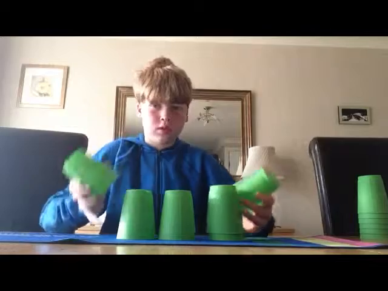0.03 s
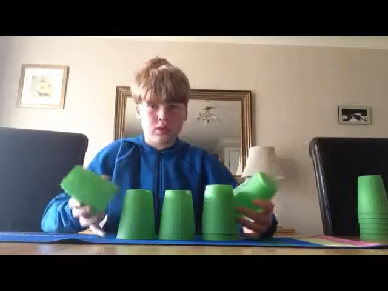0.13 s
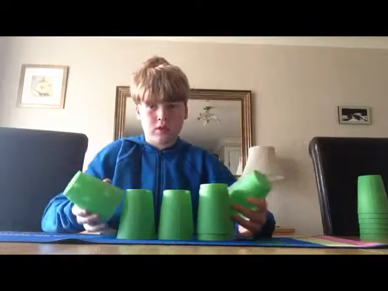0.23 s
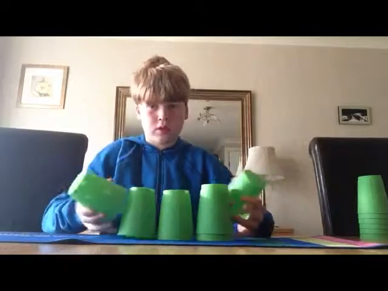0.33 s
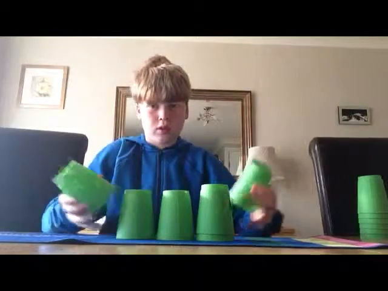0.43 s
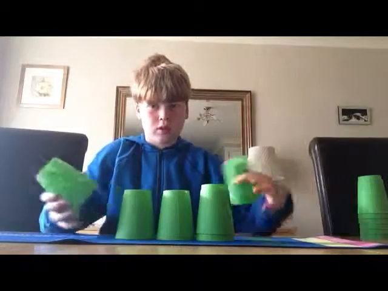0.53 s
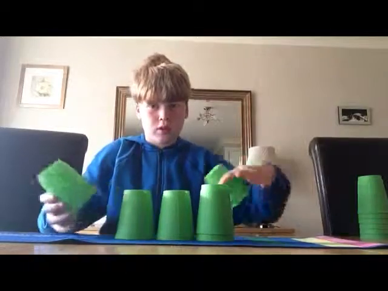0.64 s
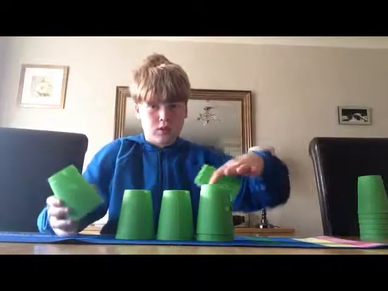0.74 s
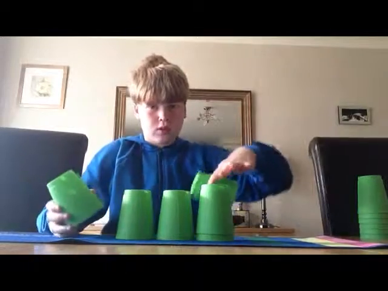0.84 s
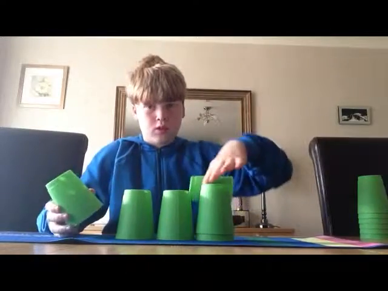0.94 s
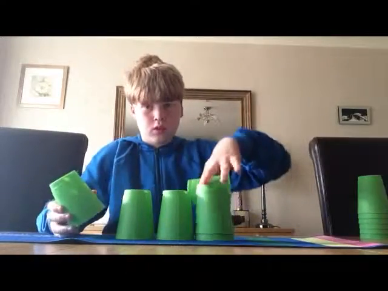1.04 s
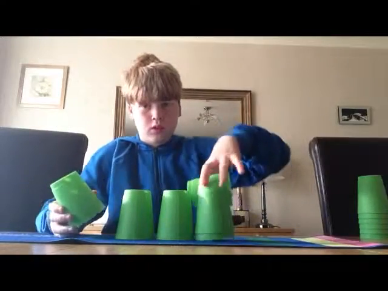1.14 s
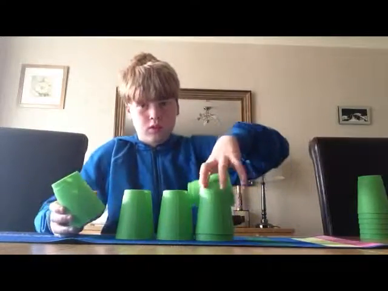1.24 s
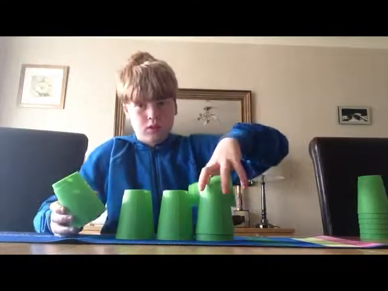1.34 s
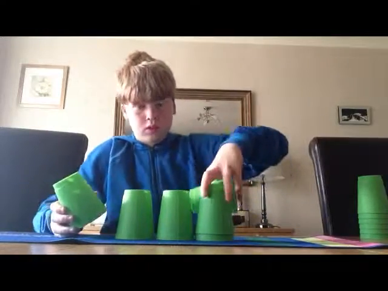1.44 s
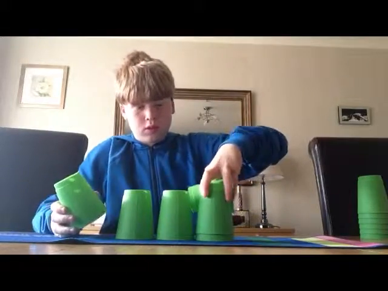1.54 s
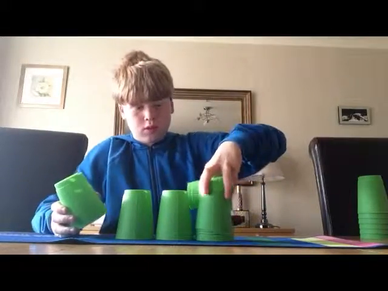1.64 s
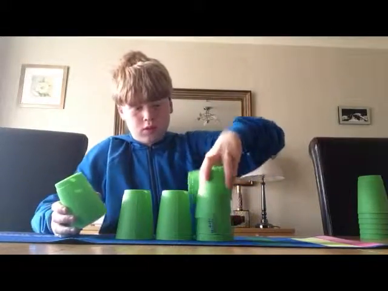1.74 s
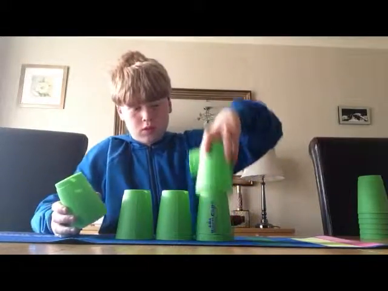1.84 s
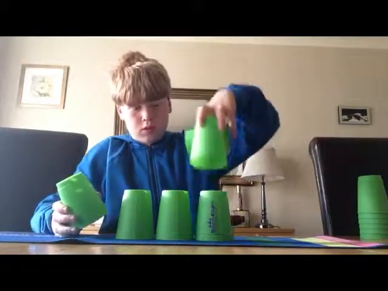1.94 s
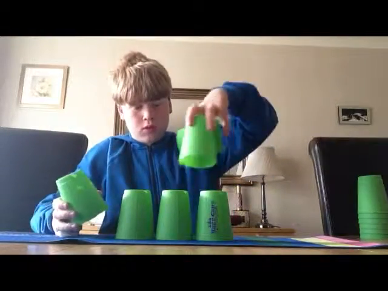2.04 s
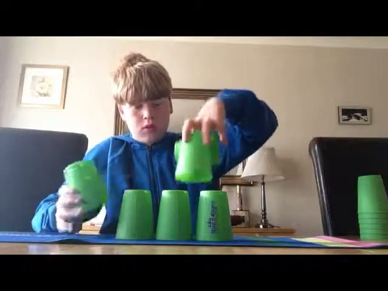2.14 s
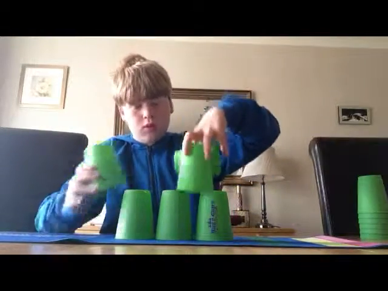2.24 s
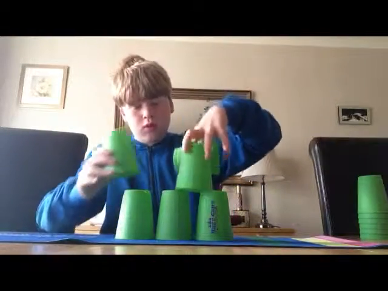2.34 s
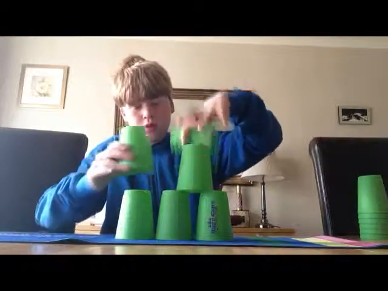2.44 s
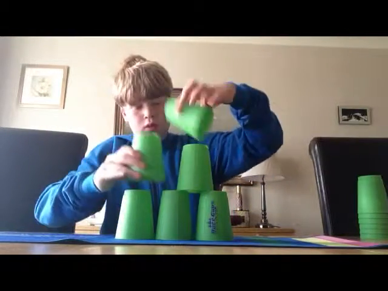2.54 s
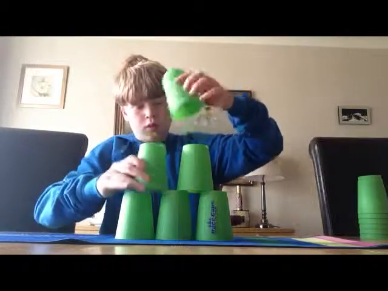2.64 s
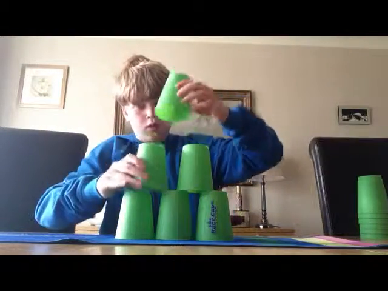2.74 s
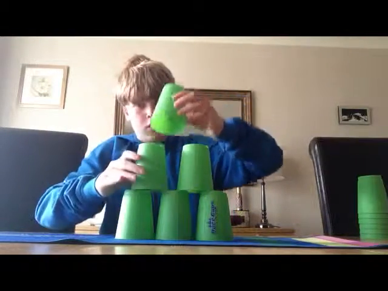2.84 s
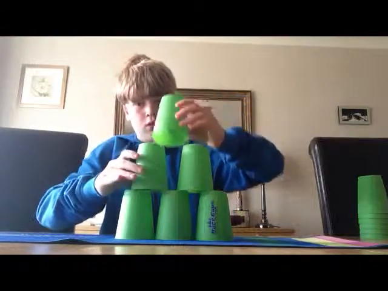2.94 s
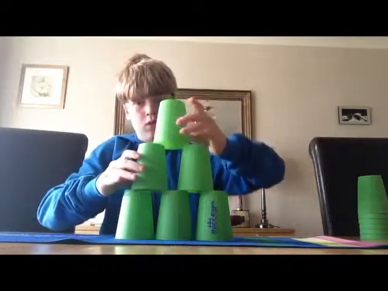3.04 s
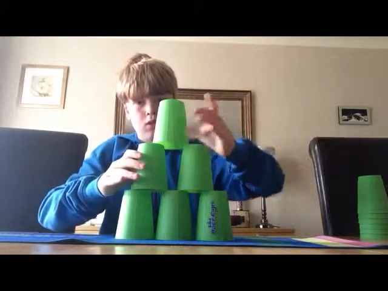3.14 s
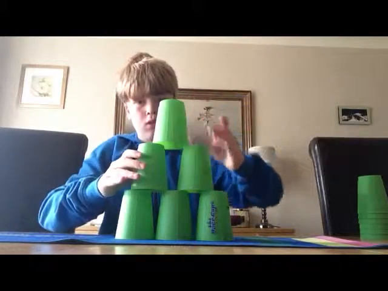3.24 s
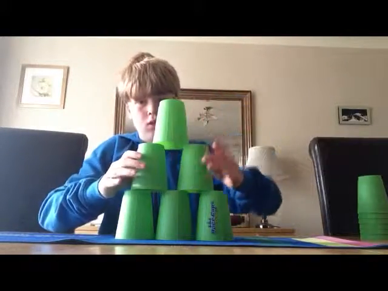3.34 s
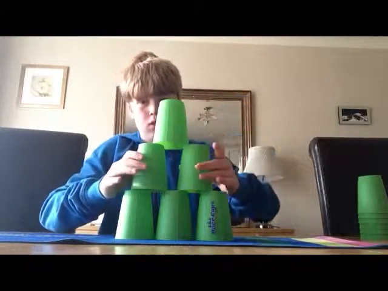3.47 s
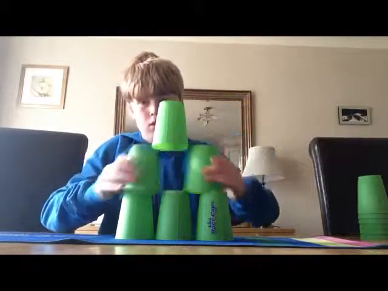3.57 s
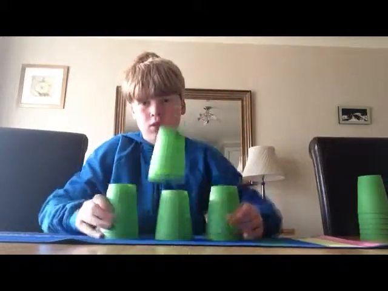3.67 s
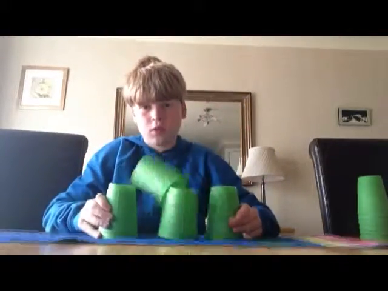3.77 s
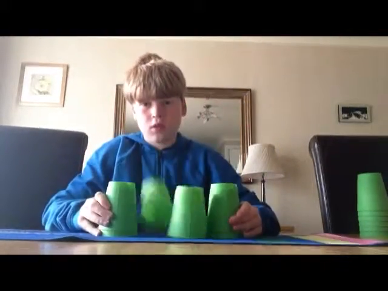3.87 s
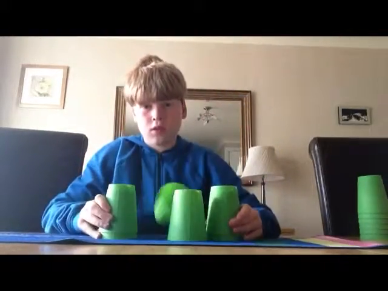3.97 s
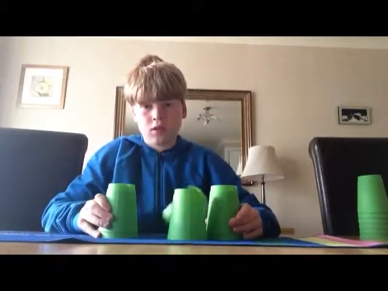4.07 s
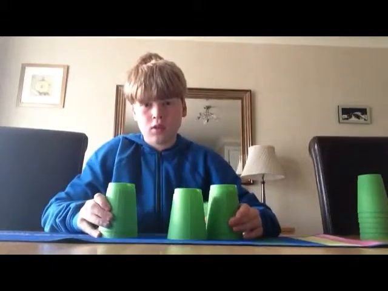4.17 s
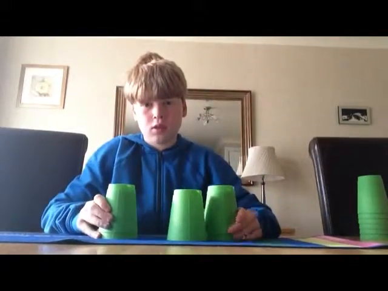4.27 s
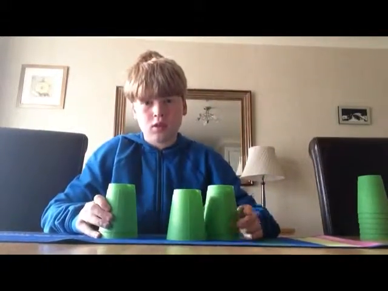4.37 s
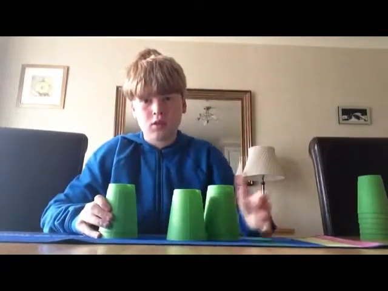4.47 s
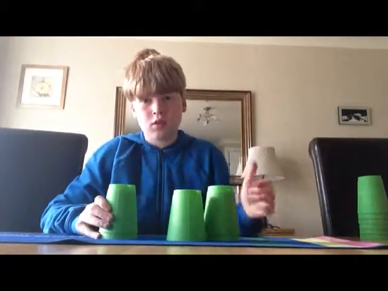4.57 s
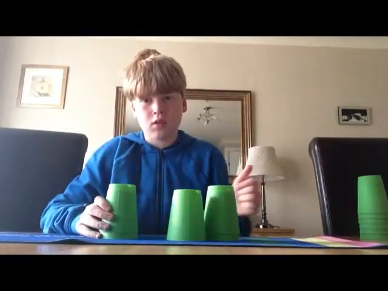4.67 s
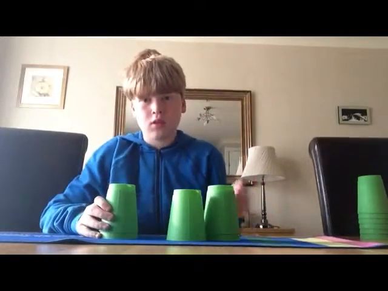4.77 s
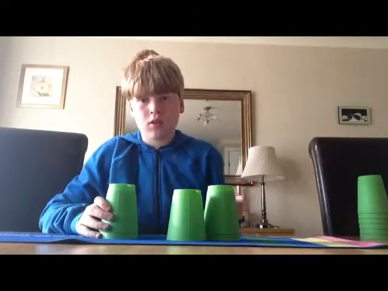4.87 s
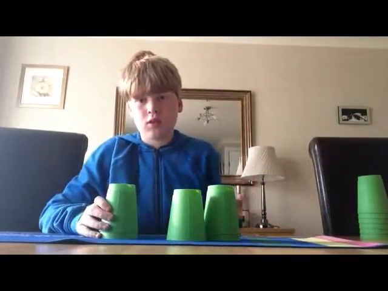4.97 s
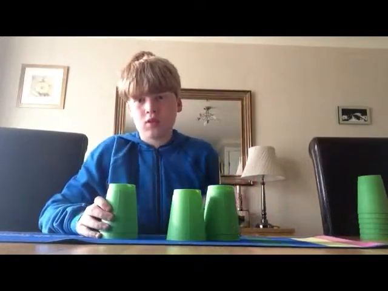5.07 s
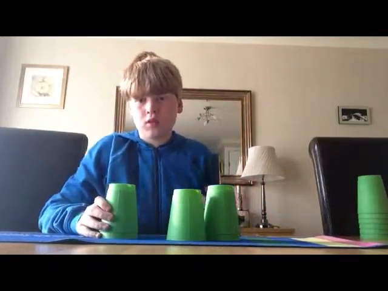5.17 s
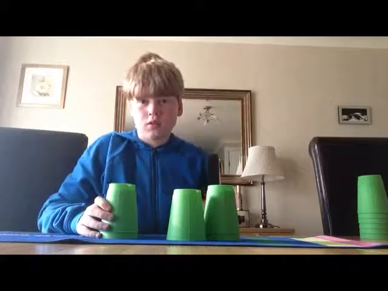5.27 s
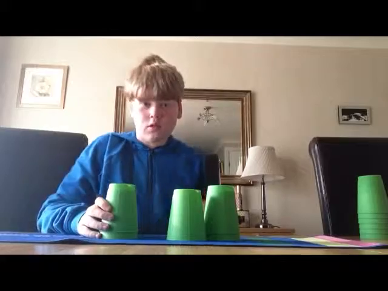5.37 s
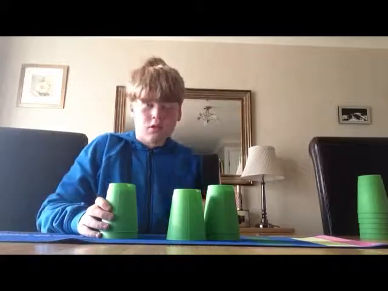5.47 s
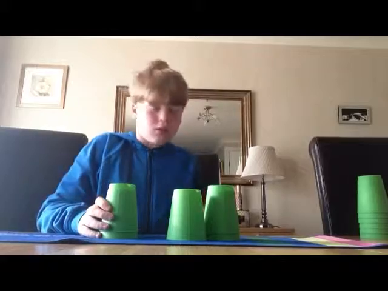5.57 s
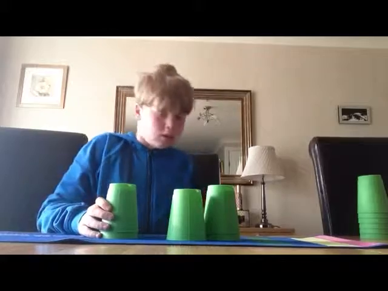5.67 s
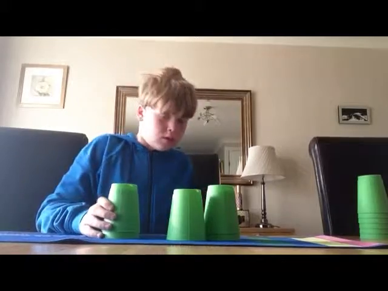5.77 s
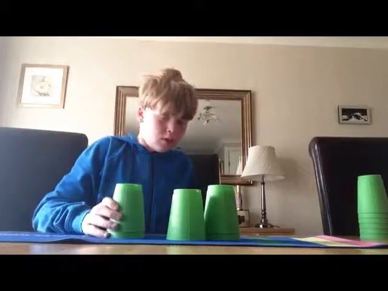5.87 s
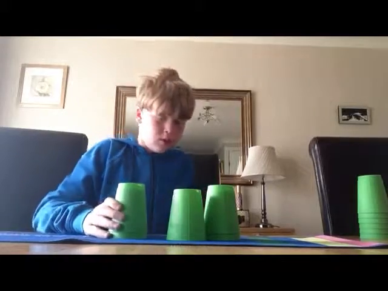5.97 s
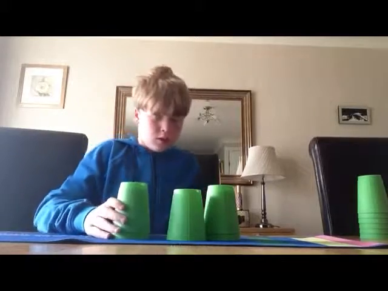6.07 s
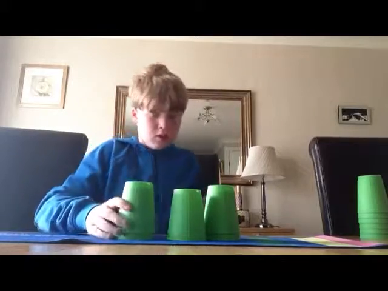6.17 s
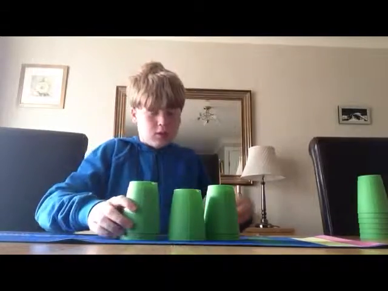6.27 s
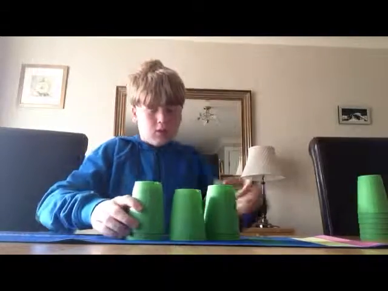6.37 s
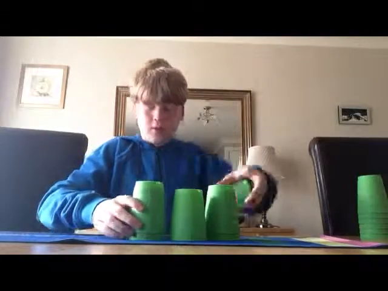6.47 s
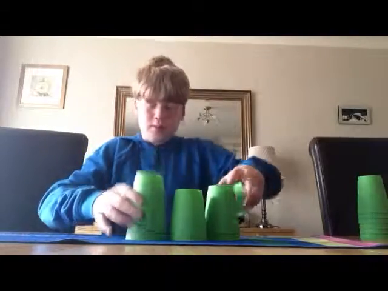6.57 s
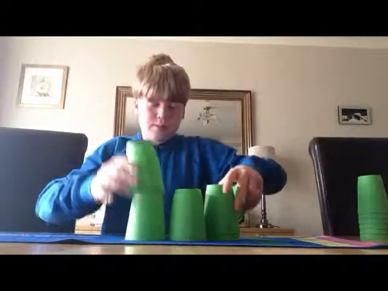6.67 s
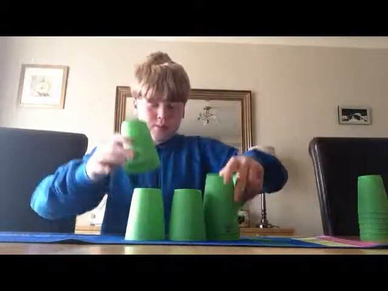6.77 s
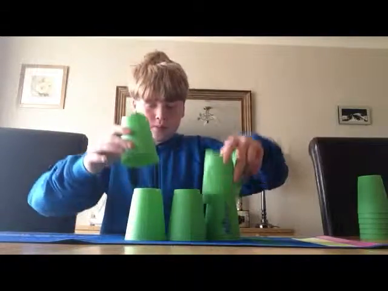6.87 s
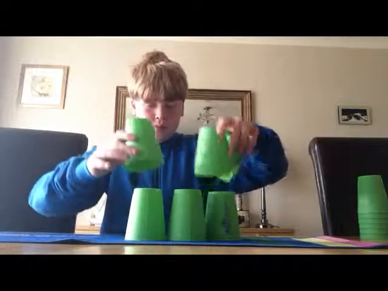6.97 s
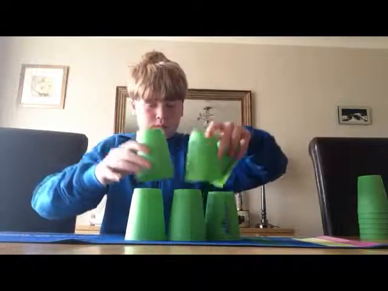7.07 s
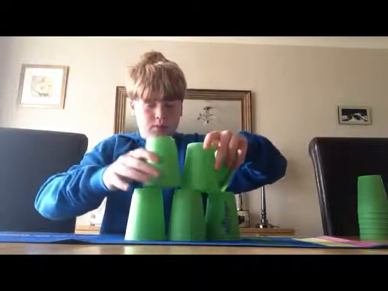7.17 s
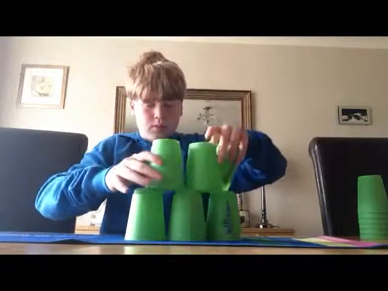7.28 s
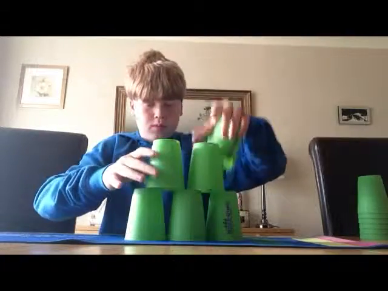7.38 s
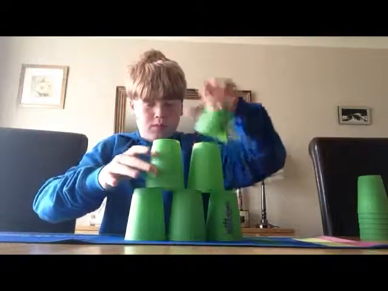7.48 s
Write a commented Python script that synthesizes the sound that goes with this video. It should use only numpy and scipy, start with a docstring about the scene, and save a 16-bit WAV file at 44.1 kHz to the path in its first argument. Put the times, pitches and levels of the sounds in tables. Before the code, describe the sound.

Plastic cups clack hollowly onto a table mat in quick bursts, then collapse in a sharp clatter, one bouncing to rest before stacking resumes.

```python
"""Faint rubbing comes first, then plastic cups are set down, stacked and knocked over on a table mat.
The place is a small dining room; a small microphone on the table limits the loudest blows.
Blows ring the table top, cup wall and rim, and all but table bumps the cup air, as dying sines.
Sleeves and cups rub between blows as coloured grains; one cup tumbles and bounces to rest.
Sparse decaying taps make the room tail, and steady coloured noise the quiet of the room."""
import sys
import numpy as np
from scipy import signal
from scipy.fft import rfft, irfft, next_fast_len
from scipy.io import wavfile
from scipy.ndimage import uniform_filter1d

SR = 44100
rng = np.random.default_rng(int(sys.argv[2]) if len(sys.argv) > 2 else 0)


def int16_out(signal):
    """Quantize to a 16-bit WAV file."""
    q = np.round(np.clip(np.atleast_2d(signal).T, -1, 1) * 32767)
    wavfile.write(sys.argv[1], SR, q.astype(np.int16))


N = 331191  # length [samples]

# Levels in every table are taken ahead of the microphone.
# Background noise of the room: (frequency [Hz], relative density [dB per Hz])
ROOM_NOISE_COLOUR = [(18, -75), (30, -70), (70, -35), (86, -9.5), (134, -11.5), (165, -5.5), (600, -16.5),
                     (4420, -24.5), (6050, -17.5), (14000, -36.5), (16000, -20.5)]
ROOM_NOISE_DB = -71.5  # rms
# Decay of the room tail: (frequency [Hz], t60 [s])
ROOM_DECAY = [(150, 0.49), (400, 0.43), (1000, 0.4), (2000, 0.38), (5000, 0.46), (8000, 0.33),
              (12000, 0.25)]

# Fine scrape on cloth, coarse rasp between cup walls, dull rumble where the table resounds,
# each: (frequency [Hz], relative density [dB per Hz])
SCRAPE_COLOUR = [(2060, -30), (3500, -25.5), (6200, -1.5), (7410, -3), (13900, -39), (15200, -36.5),
                 (16000, -55)]
RASP_COLOUR = [(710, -42), (1200, -26.5), (1440, -11.5), (2440, -2), (2660, -6.5), (5000, -5), (6500, -12),
               (11000, -120)]
RUMBLE_COLOUR = [(59, -55), (100, -40.5), (178, 1), (216, -6), (290, -0.5), (478, -19.5), (547, -8.5),
                 (814, -3.5), (1500, -16.5), (1950, -38), (3300, -120)]
# Rubbing strokes, relative levels: (full strength at [s], swell [s], hold [s], fade [s],
# fine scrape [dB], coarse rasp [dB], dull rumble [dB])
RUB_STROKES = [(0, .01, 0.0058, .09, -62, -67.5, -63.5), (0.11, .012, 0.0078, 0.18, -53, -44.5, -56.5),
               (0.15, 0.042, 0, 0.34, -46.5, -49.5, -59.5), (.31, 0.014, 0.017, 0.21, -54, -54.5, -55.5),
               (0.355, 0.025, 0.0076, 0.11, -37.5, -35, -47), (.57, 0.12, 0.019, 0.27, -68, -63, -61),
               (0.927, 0.032, .022, 0.053, -54, -66, -79), (1.253, 0.024, 0.00075, 0.089, -49, -47, -57),
               (1.456, 0.09, 0.033, 0.14, -63.5, -65, -80), (1.612, 0.16, 0.16, 0.12, -68, -81, -68),
               (1.785, .15, 0.0029, 0.048, -56.5, -42, -66), (1.933, .04, 0, 0.042, -64, -68, -66),
               (3.524, 0.086, 0.12, 0.12, -86, -72, -57.5), (3.665, 0.062, 0.0013, 0.038, -32.5, -32, -27),
               (3.685, 0.013, 0.12, 0.25, -21, -22.5, -22), (4.101, .05, 0.0055, 0.06, -83, -53, -39),
               (4.259, 0.019, 0, 0.042, -47, -55, -16.5), (4.302, 0.052, 0.27, 0.23, -39, -42, -29.5),
               (4.696, .1, 0, 0.078, -48, -46, -47.5), (4.774, 0.046, 0.053, .15, -51.5, -52, -63),
               (5.068, 0.055, 0, 0.23, -63, -49, -35.5), (5.112, 0.031, 0, 0.11, -47.5, -48.5, -72),
               (5.29, 0.045, 0, 0.23, -56, -48, -33), (5.462, 0.059, 0, 0.2, -53.5, -54.5, -68.5),
               (5.617, .1, 0.17, 0.13, -71, -65.5, -63), (5.848, 0.076, 0, 0.29, -51.5, -57, -52),
               (6.024, 0.24, .2, 0.79, -51.5, -57.5, -64.5), (6.38, 0.43, 0.094, .15, -46, -59.5, -64.5),
               (6.656, 0.043, 0.011, 0.016, -40.5, -49.5, -58.5),
               (6.732, 0.01, 0.0038, 0.089, -62, -55, -61), (6.867, 0.096, 0.064, 0.074, -43.5, -43, -63),
               (6.951, 0.072, 0, .12, -34, -40, -68), (7.21, 0.027, 0.004, .05, -78.5, -78, -63)]
STROKE_RANGE_DB = 30  # gained in the swell, lost in the fade

# Ringing modes of the air in a cup, the cup wall, the rim, the table's thud and knock, and the rim crack,
# each before its pitch factor: (frequency [Hz], relative level [dB], t60 [s])
CUP_AIR_MODES = [(1050, -5.5, 0.015), (1042, 8.5, 0.024), (1180, 7.5, 0.041)]
CUP_WALL_MODES = [(1369, -10.5, 0.017), (1712, 0, 0.0061), (1919, -4.5, 0.011), (2430, -5, 0.0058),
                  (2752, -10, 0.0096)]
RIM_MODES = [(5800, 0, .007), (6200, -1, .006)]
TABLE_THUD_MODES = [(185, -4, .03), (255, -1, .025), (300, 0, .02), (370, -1, .015)]
TABLE_KNOCK_MODES = [(474, -0.5, 0.032), (524, 1.5, 0.025), (597, -3.5, 0.062), (718.5, 3, 0.03),
                     (770, -2, 0.049)]
RIM_CRACK_MODES = [(3420, -2.5, 0.0011), (5950, -1.5, 0.0026), (7510, -5.5, 0.002), (11000, -23, 0.0013)]
CUP_VARIETY, AIR_UNEVEN_DB = .02, 1.5  # no two cups and landings ring quite alike: pitch, mode levels

# A cup lands mouth down: (time [s], cup air [dB], table knock [dB], cup wall [dB], rim crack [dB],
# softer second burst after [s])
CUP_LANDINGS = [(.109, -41, -41, -42, -34, .02), (.351, -12.5, -22.5, -29.5, -43, .02),
                (1.927, -60, -80, -78.5, -74, .02), (2.194, -54.5, -77, -77, -74.5, .02),
                (2.313, -6, -9, -21, -12.5, .022), (2.481, -10.5, -14, -26.5, -18.5, .027),
                (2.705, -6, -6.5, -15, -10.5, .012), (2.734, -12.5, -14.5, -28, -38, .02),
                (2.864, -20.5, -27, -36.5, -38, .02), (3.073, -6, -10.5, -22, -23.5, .016),
                (3.138, -7, -12.5, -23, -16.5, .014), (3.588, -31.5, -30.5, -67, -41, .02),
                (3.626, -23.5, -25.5, -50, -59, .02), (3.662, -13, -20, -33, -37, .012),
                (3.684, -11.5, -27, -25, -16, .02), (3.797, -6.5, -6, -9.5, -32, .024),
                (3.82, -8, -31.5, -18, -24, .02), (3.888, -18.5, -11, -16.5, -5, .02),
                (4.238, -13, -20.5, -27, -13.5, .02), (4.723, -39.5, -51, -59.5, -45.5, .02),
                (5.037, -29, -24.5, -30.5, -55, .009), (5.243, -45, -51.5, -56, -55, .022),
                (5.284, -20.5, -16.5, -29.5, -51, .02), (6.999, -49.5, -62.5, -58, -45, .02),
                (7.226, -33, -19, -27, -22.5, .005), (7.235, -6, -9.5, -16, -9, .024),
                (7.296, -12, -15.5, -20, -38, .008), (7.309, -7, -13, -27, -13.5, .018),
                (7.384, -10.5, -14.5, -21.5, -16.5, .025), (7.486, -35, -38, -71, -62, .012)]
LANDING_THUD_DB, LANDING_PITCH = -26, 0.938  # thud relative to the knock; pitch factor
SECOND_DB, SECOND_CRACK_DB, SECOND_PITCH = -10.5, -26.5, .87  # relative to the first burst; pitch factor

# A cup is struck on its side; from 4.2 s a fallen cup bounces to rest:
# (time [s], cup wall [dB], table knock [dB], rim crack [dB])
CUP_SIDE_KNOCKS = [(1.07, -48, -49, -45.5), (1.597, -44, -45.5, -66), (3.727, -9.5, -40, 1.5),
                   (3.735, -7.5, -19, -5), (3.842, -15.5, -25, -33.5), (4.246, -13, -15, -2.5),
                   (4.342, -4.5, -32, -8.5), (4.396, -6, -21.5, -24), (4.452, -19.5, -28, -16),
                   (4.492, -11.5, -22.5, -27), (4.528, -24, -25, -37), (4.557, -28, -31, -29),
                   (4.58, -44, -33, -33), (4.595, -43, -26, -38), (4.613, -30.5, -26.5, -37),
                   (5.11, -39, -60, -51), (5.455, -46, -63, -70), (5.543, -47, -64, -66),
                   (6.013, -51.5, -51.5, -66), (6.392, -43, -45.5, -48.5), (6.467, -45.5, -47.5, -56),
                   (6.702, -46, -49.5, -55), (6.732, -48, -49, -60)]
SIDE_AIR_DB, SIDE_THUD_DB, SIDE_PITCH = -12.5, -26.5, 0.941  # relative to the wall; pitch factor

# Something soft or heavy bumps the table: (time [s], thud [dB], knock [dB])
TABLE_BUMPS = [(.427, -39, -27.5), (0.491, -19.5, -22.5), (1.249, -56.5, -45), (1.276, -47, -68),
               (1.475, -59, -50), (4.111, -25.5, -50.5), (4.353, -35, -30), (4.543, -51, -39),
               (4.612, -36, -45), (4.762, -51, -45), (5.265, -42.5, -34.5), (5.39, -28, -39),
               (5.856, -58.5, -38), (6.705, -41, -50.5), (6.789, -55, -50), (6.909, -42.5, -62)]
BUMP_WALL_DB, BUMP_CRACK_DB = -18, -22  # relative to the knock

# A rim clicks against another: (time [s], rim crack [dB], table knock [dB])
RIM_CLICKS = [(.304, -25, -45), (1.512, -24.5, -40.5), (3.666, -15, -27), (3.701, 1.5, -28),
              (3.715, -8, -20), (3.965, -28.5, -21.5), (4.109, -39.5, -46), (5.833, -49.5, -53),
              (6.516, -35, -50.5), (6.621, -44, -54), (6.696, -27, -55), (7.259, -16, -28)]
CLICK_BODY_DB, CLICK_AIR_DB = -3, -6  # wall and thud, then air, relative to the knock

# Faint taps while a hand shifts cups about: range of times [s], range of part levels [dB]
FIDGET_S, FIDGET_DB = (5.55, 6.8), (-70, -56)


def gain_of(db):
    """Decibels to amplitude."""
    return 10 ** (np.asarray(db) / 20)


def evened(x):
    """Scales to rms 1."""
    return x / np.sqrt(np.mean(x ** 2) + 1e-20)


def read(points, hz):
    """Reads a table on a log-frequency axis."""
    f, value = np.transpose(points)
    return np.interp(np.log(hz + 1), np.log(f + 1), value)


def coloured(x, spectrum):
    """Weights x by a spectrum and scales the result to rms 1."""
    size = next_fast_len(len(x))
    weight = gain_of(read(spectrum, np.fft.rfftfreq(size, 1 / SR)))
    return evened(irfft(rfft(x, size) * weight, size)[:len(x)])


def room_noise():
    """The quiet of the room: steady noise in the colour of the background."""
    return gain_of(ROOM_NOISE_DB) * coloured(rng.standard_normal(N), ROOM_NOISE_COLOUR)


def room_tail(x):
    """Sparse taps of random sign from the table top outward, each band dying at its own speed."""
    taps = np.zeros((3, SR // 2))
    # one tap somewhere in every 20 samples
    jitter = rng.integers(0, 20, (3, (SR // 2 - 61) // 20))
    at = np.arange(60, SR // 2 - 20, 20) + jitter
    np.put_along_axis(taps, at, rng.choice([-1., 1.], at.shape), 1)

    hz, t, bands = signal.stft(taps, SR, nperseg=256)
    decay = gain_of(-60 * t / read(ROOM_DECAY, hz)[:, None])
    tails = signal.istft(bands * decay, SR, nperseg=256)[1]
    # the walls answer after the table top
    tails *= 1 - 0.12 * np.exp(-np.arange(tails.shape[1]) / SR / 0.0022)
    tails /= np.linalg.norm(tails, axis=1, keepdims=True)

    # the three tails take turns, 1.7 cycles a second
    turn = 2 * np.pi * (np.arange(N) / SR * 1.7 + np.arange(3)[:, None] / 3)
    sends = x * np.sqrt(2 / 3) * np.cos(turn)
    return signal.fftconvolve(sends, tails, axes=1).sum(0)[:N]


def rubbing():
    """Stick-slip grains of uneven size: fine on cloth, coarse between cup walls, dull where the table resounds."""
    t = np.arange(N) / SR
    levels = np.zeros((3, N))
    for s, swell, hold, fade, *parts_db in RUB_STROKES:
        before, after = (s - t) / swell, (t - s - hold) / fade
        away = np.maximum(np.maximum(before, after), 0)
        levels += gain_of(parts_db)[:, None] * gain_of(-STROKE_RANGE_DB * away)

    sizes = gain_of(1.6 * rng.exponential(1, N)) * rng.standard_normal(N)
    grains = sizes * (rng.random(N) < 12000 / SR)  # about 12000 grains a second
    # slips come in clumps
    clumps = evened(uniform_filter1d(rng.standard_normal(N), size=300))
    catches = gain_of(1.3 * clumps)
    colours = (SCRAPE_COLOUR, RASP_COLOUR, RUMBLE_COLOUR)
    return catches * sum(level * coloured(grains, colour) for level, colour in zip(levels, colours))


def ring(modes, pitch, uneven_db, contact_s, stagger):
    """Dying sines of peak 1 that swell during the contact; mode shares vary at random from blow to blow."""
    t = np.arange(4000) / SR
    hz, db, t60 = np.transpose(modes)[..., None]
    # neighbours start out of step, by stagger [cycles]
    phase = 2 * np.pi * (hz * pitch * t + stagger * np.arange(len(modes))[:, None])
    decay = gain_of(db + uneven_db[:len(modes), None] - 60 * t / t60)
    x = (decay * np.sin(phase)).sum(0)
    x *= np.sin(np.pi / 2 * np.minimum(t / contact_s, 1)) ** 2
    return x / abs(x).max()


def add(mix, s, sound):
    """Mixes a sound in at time s."""
    part = mix[round(s * SR):][:len(sound)]
    part += sound[:len(part)]


def strikes():
    """Every blow as (s, cup air, table thud, table knock, cup wall, rim crack dB, cup pitch factor)."""
    rows = []
    for s, air_db, knock_db, wall_db, rim_db, second_s in CUP_LANDINGS:
        body_db = np.array([air_db, knock_db + LANDING_THUD_DB, knock_db, wall_db])
        rows.append((s, *body_db, rim_db, LANDING_PITCH))
        rows.append((s + second_s, *(body_db + SECOND_DB), rim_db + SECOND_CRACK_DB, SECOND_PITCH))
    for s, wall_db, knock_db, rim_db in CUP_SIDE_KNOCKS:
        rows.append((s, wall_db + SIDE_AIR_DB, wall_db + SIDE_THUD_DB, knock_db, wall_db, rim_db, SIDE_PITCH))
    for s, thud_db, knock_db in TABLE_BUMPS:
        rows.append((s, -np.inf, thud_db, knock_db, knock_db + BUMP_WALL_DB, knock_db + BUMP_CRACK_DB, 1))
    for s, rim_db, knock_db in RIM_CLICKS:
        body_db = knock_db + CLICK_BODY_DB
        rows.append((s, knock_db + CLICK_AIR_DB, body_db, knock_db, body_db, rim_db, 1))
    fidget_times = rng.uniform(*FIDGET_S, size=14)
    fidget_levels = rng.uniform(*FIDGET_DB, size=(14, 5))
    for s, parts_db in zip(fidget_times, fidget_levels):
        rows.append((s, *parts_db, LANDING_PITCH))
    return rows


def blows():
    """Each blow cracks and sounds its parts, which die away."""
    bodies, cracks = np.zeros((2, N))
    rows = strikes()
    chance = rng.standard_normal((len(rows), 6, 8))
    for (s, air_db, thud_db, knock_db, wall_db, rim_db, pitch), luck in zip(rows, chance):
        air_pitch = pitch * (1 + CUP_VARIETY * luck[0, -1])
        air = ring(CUP_AIR_MODES, air_pitch, AIR_UNEVEN_DB * luck[0], 0.0021, 0.42)
        thud = ring(TABLE_THUD_MODES, 1, luck[1], .002, .1)
        knock = ring(TABLE_KNOCK_MODES, 0.92, 2 * luck[2], 0.001093, 0.23)
        wall = ring(CUP_WALL_MODES, pitch, 2 * luck[3], 0.00098, 0.35)
        rim = ring(RIM_MODES, 1, luck[4], .001, .3)
        add(bodies, s, gain_of(air_db) * air)
        add(bodies, s, gain_of(thud_db) * thud)
        add(bodies, s, gain_of(knock_db) * knock)
        add(bodies, s, gain_of(wall_db) * wall)
        add(bodies, s + .001, gain_of(wall_db - 10) * rim)

        crack_pitch = 1 + 0.037 * luck[5, -1]
        crack = gain_of(rim_db) * ring(RIM_CRACK_MODES, crack_pitch, 2 * luck[5], 0.00012, 0.25)
        add(cracks, s, crack)
        # a second, softer crack follows 1.5 ms or more later
        second_crack_s = s + .0015 + .001 * abs(luck[5, -2])
        add(cracks, second_crack_s, gain_of(-9) * crack)
    return bodies, cracks


def scene():
    """Near sounds on the table, their room tail and the quiet of the room."""
    bodies, cracks = blows()
    rub = rubbing()
    background = room_noise()
    # cracks spread upward into the room
    outward = gain_of(-6) * bodies + gain_of(-3.0) * cracks + gain_of(-14.5) * rub
    near = bodies + cracks + gain_of(-3.5) * rub
    return (near + room_tail(outward) + background)[None]


def record(dry):
    """Microphone: bass roll-off, a limit on peaks whose baseline shift thumps low, then the band limit."""
    thin = signal.sosfilt(signal.butter(4, 155, "high", fs=SR, output="sos"), dry)
    ceiling = .72  # amplitude that the soft limit approaches
    held = thin / (1 + (thin / ceiling) ** 6) ** (1 / 6)
    # the even power makes the limit lopsided
    shift_band = signal.butter(1, [15, 90], "band", fs=SR, output="sos")
    shift = signal.sosfilt(shift_band, held ** 4)
    band_limit = signal.firwin(511, 15800, window=("kaiser", 9), fs=SR)  # low-pass edge in Hz
    return signal.oaconvolve(held - 0.18 * shift, band_limit[None], "same")


dry = scene()
out = record(dry)
int16_out(out)
```